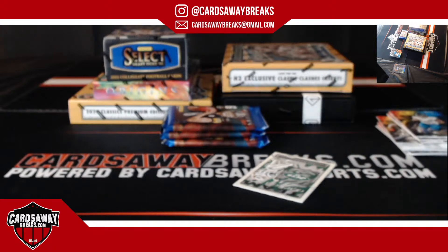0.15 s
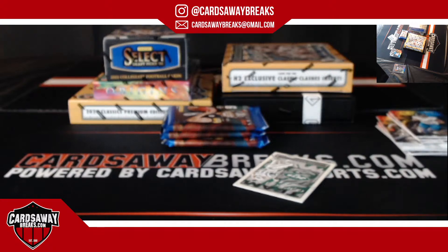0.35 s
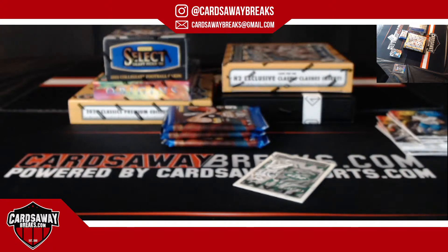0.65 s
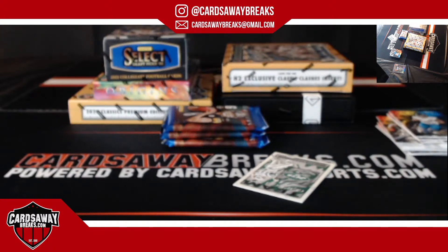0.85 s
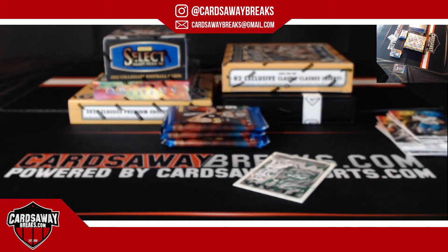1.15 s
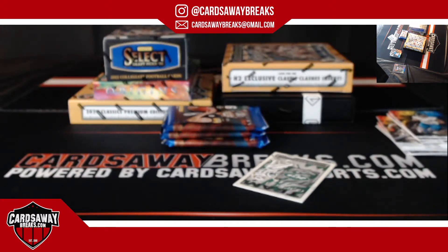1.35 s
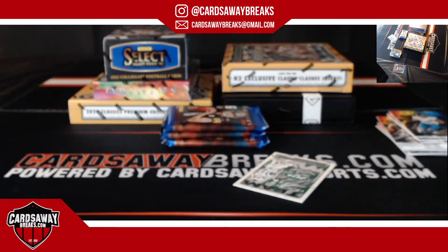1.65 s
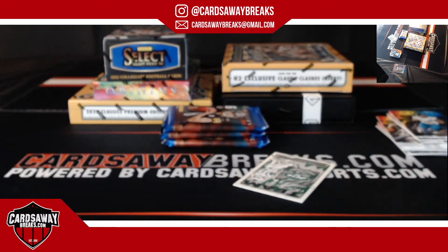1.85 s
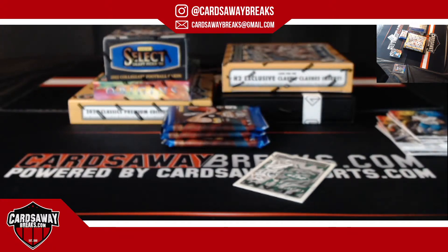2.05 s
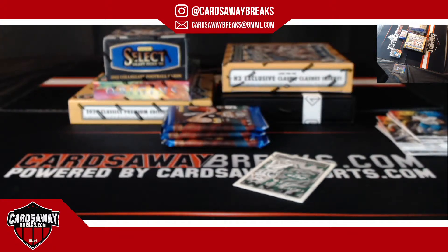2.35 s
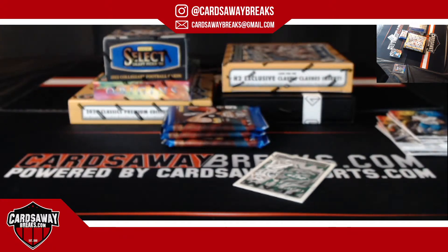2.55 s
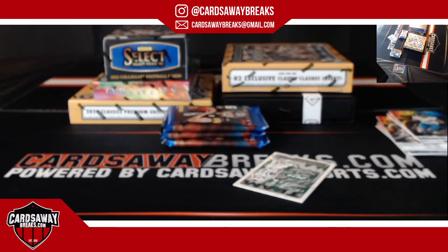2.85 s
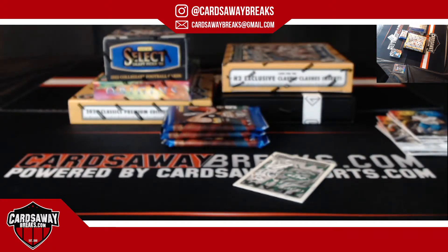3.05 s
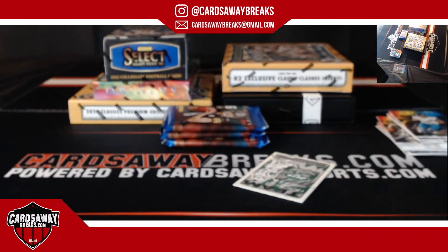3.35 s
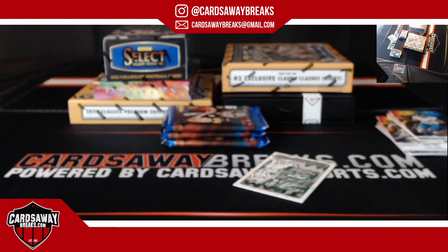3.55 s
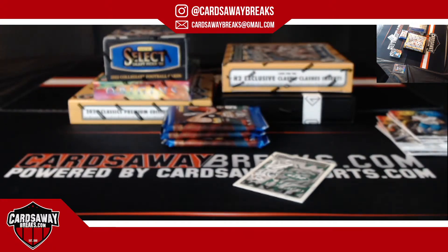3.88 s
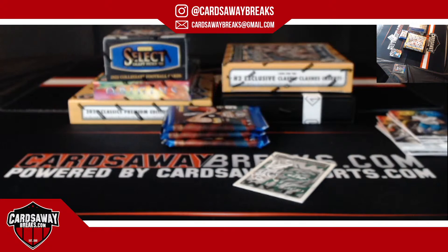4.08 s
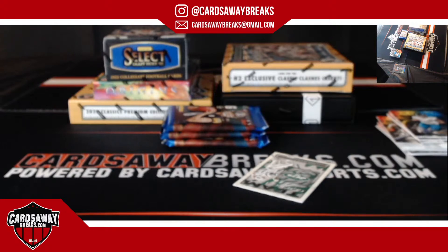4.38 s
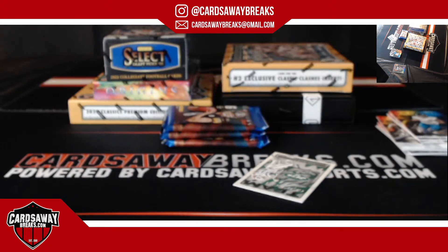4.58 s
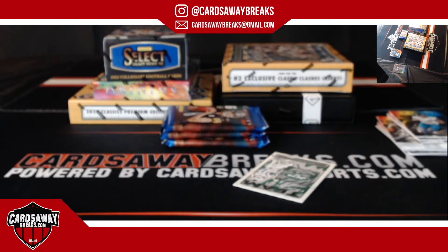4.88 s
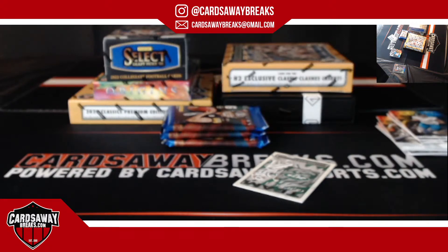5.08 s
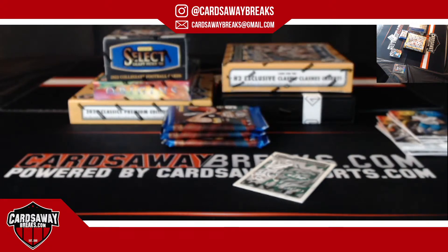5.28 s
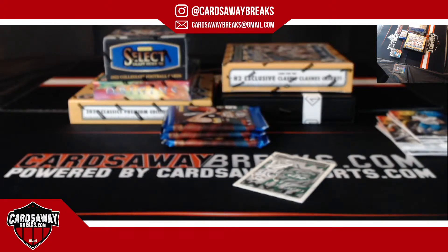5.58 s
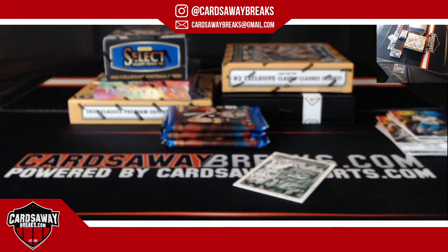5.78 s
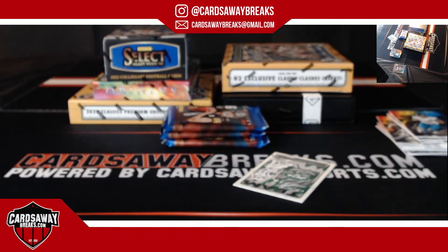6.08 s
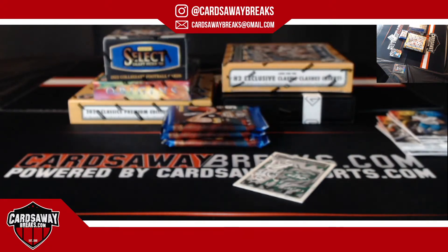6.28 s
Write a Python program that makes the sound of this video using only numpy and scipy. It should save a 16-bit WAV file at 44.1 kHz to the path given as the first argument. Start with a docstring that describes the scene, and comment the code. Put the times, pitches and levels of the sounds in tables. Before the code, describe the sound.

At a table in a small room, a trading card and a thin plastic sleeve are handled close to the microphone. After a few faint ticks and a soft bump, the card slides in with a short, falling swish. The plastic snaps crisply several times and rustles lightly under the fingers. Near the end a hard plastic case is set down with one ringing clack, followed by a soft bump. Low ventilation rumbles faintly throughout.

```python
"""A table in a small room: trading cards are worked into thin plastic sleeves, heard from close by.
The film rubs and buckles in snaps; one card slides in, and the pocket's resonance falls as it deepens.
A hard plastic case is knocked down and rings with the table; hands bump the padded top softly.
A low ventilation rumble lies under it all."""
import sys
import numpy as np
from scipy import signal
from scipy.fft import rfft, irfft, next_fast_len
from scipy.io import wavfile

SR = 44100
rng = np.random.default_rng(int(sys.argv[2]) if len(sys.argv) > 2 else 0)


def wrap_up_sound(samples):
    """Save the sound to the file named by the first command line argument, as 16-bit audio."""
    columns = np.atleast_2d(samples).T
    # keep every value between -1 and 1, then stretch to whole-number steps
    tamed = np.clip(columns, -1, 1)
    steps = np.round(tamed * 32767).astype(np.int16)
    wavfile.write(sys.argv[1], SR, steps)


N = 283547


def amp(db):
    """Decibels to gain."""
    return 10 ** (np.asarray(db) / 20)


def unit(x):
    """x at rms 1."""
    return x / np.sqrt(np.mean(x ** 2) + 1e-20)


def along(points, hz):
    """(f/Hz, value) points read on a log frequency axis."""
    f, values = np.transpose(points)
    return np.interp(np.log(hz + 1), np.log(f + 1), values)


def curve(spectrum):
    """Gain function of a (f/Hz, level/dB) spectrum."""
    return lambda hz: amp(along(spectrum, hz))


def spread(knots, t, span):
    """Evenly spaced knots over 0..span, read at t."""
    return np.interp(t, np.linspace(0, span, len(knots)), knots)


def add(track, start_s, x):
    """Mix x into the track from start_s."""
    part = track[round(start_s * SR):][:len(x)]
    part += x[:len(part)]


def filtered(x, gain):
    """x through the minimum-phase filter gain(hz)."""
    m = 2 * next_fast_len(len(x) // 2 + 2048)
    magnitude = np.maximum(gain(np.fft.rfftfreq(m, 1 / SR)), 1e-6)
    cepstrum = irfft(np.log(magnitude), m)
    cepstrum[1:m // 2] *= 2
    cepstrum[m // 2 + 1:] = 0
    return irfft(rfft(x, m) * np.exp(rfft(cepstrum)), m)[:len(x)]


def swept(x, gain):
    """x through the time-varying filter gain(hz, t)."""
    hz, t, frames = signal.stft(x, SR, nperseg=256)
    return signal.istft(frames * gain(hz[:, None], t), SR, nperseg=256)[1][:len(x)]


def coloured(x, spectrum):
    """x filtered by a (f/Hz, level/dB) spectrum, at rms 1."""
    return unit(filtered(x, curve(spectrum)))


def resonance(hz, centre_hz, q):
    """Gain of one resonance, 1 at its centre."""
    return 1 / np.sqrt(1 + (q * (hz / centre_hz - centre_hz / (hz + 1))) ** 2)


def burst(gain, t60_s):
    """Decaying cluster of micro-contacts, with the energy of 2 ms at rms 1."""
    t = np.arange(SR // 12) / SR
    contacts = rng.choice([-1, 1], len(t)) * rng.uniform(0.9, 1, len(t))
    x = filtered(contacts * amp(-60 * t / t60_s), gain)
    return x * np.sqrt(.002 * SR / np.sum(x ** 2))


def friction(count, grain_db, rate_hz):
    """Noise whose strength jumps as surfaces catch and let go."""
    position = np.arange(count) * rate_hz / SR
    knots = rng.standard_normal(int(position[-1]) + 2)
    grip = np.interp(position, np.arange(len(knots)), knots)
    return rng.standard_normal(count) * amp(grain_db * grip)


# Ventilation spectrum: f/Hz, level/dB
VENT_SPECTRUM = [(12, -31.5), (20, 3), (96, -7.5), (146, -13), (168, -16.5), (204, -10), (319, -18),
                 (527, -23), (607, -26), (660, -26), (949, -31), (1030, -29.5), (1220, -36), (1960, -37.5),
                 (16000, -51)]


def ventilation():
    """Steady rumble with a faint hiss."""
    return amp(-63.5) * coloured(rng.standard_normal(N), VENT_SPECTRUM)


# Room decay: f/Hz, t60/s
ROOM_DECAY = [(100, 0.48), (400, 0.2), (1500, .22), (3000, 0.21), (6000, .22), (14000, 0.18)]


def room_tail(build_s):
    """Diffuse reflections build up, then die at each frequency's own rate; energy 1."""
    tail = swept(rng.standard_normal(SR // 2), lambda hz, t: amp(-60 * t / along(ROOM_DECAY, hz)))
    tail *= 1 - np.exp(-np.arange(len(tail)) / SR / build_s)
    return tail / np.linalg.norm(tail)


# Dull contact spectrum, also for card flicks: f/Hz, level/dB
DULL_SPECTRUM = [(60, -18), (200, -14), (430, 2.5), (700, -4), (1400, -5.5), (4000, -34)]
# Soft bumps: t/s, level/dB, f/Hz, t60/s
SOFT_BUMPS = [(.478, -38.5, 114, 0.034), (0.5421, -46.5, 216, 0.014), (2.325, -44.5, 56.3, 0.075),
              (3.2595, -43, 515, 0.021), (6.276, -52, 324, 0.067), (6.2798, -37, 144, 0.026),
              (6.304, -49, 225, 0.092)]


def bumps():
    """A hand or card edge on the padded table gives a damped swing and a dull puff."""
    out, t = np.zeros(N), np.arange(SR // 4) / SR
    for start_s, db, hz, t60_s in SOFT_BUMPS:
        swing = np.sin(2 * np.pi * hz * t) * amp(-60 * t / t60_s)
        puff = burst(curve(DULL_SPECTRUM), t60_s=.054)
        add(out, start_s, amp(db) * swing)
        add(out, start_s, amp(db - 18.5) * puff)
    return out


# Case landing, on edge then flat: t/s, relative level/dB
CASE_CONTACTS = [(5.337, -21.5), (5.3407, -22.5)]
# Contact spectrum: f/Hz, level/dB
CLACK_SPECTRUM = [(60, -34.5), (150, -16), (400, -4), (800, -2), (1350, 1), (2100, -6), (3000, -1.5),
                  (3900, -12.5), (5200, -8), (8000, -22.5), (12000, -28.5), (16000, -32.5)]
# Modes of case and table: f/Hz, relative level/dB, t60/s
CASE_TABLE_MODES = [(62, -20.5, 0.55), (132.8, -4.5, .27), (166.7, -5.5, 0.25), (198, -10.5, .25),
                    (260, -8.5, 0.23), (301, -8, 0.27), (333, -3.5, 0.2), (408.3, -3, 0.15),
                    (442, -10.5, 0.28), (572, -3, .23), (687, -9.5, 0.24), (856, -6, 0.14),
                    (888, -11.5, .2), (989, -4.5, 0.12), (1153, -8.5, 0.1), (1238, -5.5, 0.075),
                    (1357, -2.5, .14), (1494, -10.5, .22), (1700, -11, .15), (1910, -6, .1),
                    (2140, -11.5, 0.061), (2436, -4.5, .09), (2870, -3, .11), (3040, -2.5, .09),
                    (3187, -10, .11), (3674, -10, 0.082), (4670, -8, .08)]
# Knock reverberation spectrum: f/Hz, level/dB
REVERB_SPECTRUM = [(50, -26), (110, -12), (200, 1.5), (400, 2), (900, 1), (1600, -2), (2200, -10.5),
                   (3000, -4.5), (4000, -12.5), (5600, -17.5), (8000, -23), (12000, -34), (16000, -40.5)]


def case_knock():
    """Two hard contacts clack, set case and table ringing, and fill the room."""
    out, t = np.zeros(N), np.arange(SR // 2) / SR
    for start_s, db in CASE_CONTACTS:
        add(out, start_s, amp(db + 3.5) * burst(curve(CLACK_SPECTRUM), t60_s=.054))
    edge_s, flat_s = CASE_CONTACTS[0][0], CASE_CONTACTS[-1][0]
    crack = burst(curve(TICK_SPECTRUM), t60_s=.003)
    add(out, flat_s, amp(-31.5) * crack)
    ring = np.zeros(len(t))
    for hz, db, t60_s in CASE_TABLE_MODES:
        swell = 1 - np.exp(-t / (.0017 + 1 / hz))  # heavy low modes start slower
        ring += swell * amp(db - 60 * t / t60_s) * np.sin(2 * np.pi * (hz * t + rng.random()))
    add(out, edge_s, amp(-25) * ring)
    add(out, edge_s, amp(-41.5) * coloured(room_tail(build_s=.0053), REVERB_SPECTRUM))
    far_room = amp(-46 - 60 * t / .6) * coloured(rng.standard_normal(len(t)), REVERB_SPECTRUM)
    add(out, edge_s, far_room)
    return out


# Spells of finger movement: start/s, end/s, scrape/dB, hiss/dB
FIDGET_SPELLS = [(.09, .24, -89, -82), (1.4, 1.53, -97, -89), (2.26, 2.42, -81, -91),
                 (3.758, 3.88, -86, -83.5), (4.421, 5.14, -83, -90.5)]


def fidgets(every_s=.07, length_s=.07, scatter_db=1.5, sleeve_hz=3487):
    """Stroke rows for fingers shifting grip: faint, of random length, strength and pitch."""
    rows = []
    for first_s, last_s, scrape_db, hiss_db in FIDGET_SPELLS:
        grid_s = np.arange(first_s, last_s - length_s / 2, every_s)
        for due_s, (late, longer, louder, higher) in zip(grid_s, rng.standard_normal((40, 4))):
            start_s = due_s + .18 * late * every_s
            end_s = start_s + length_s * np.exp(.25 * longer)
            db = scatter_db * louder
            rows.append((start_s, end_s, scrape_db + db, hiss_db + db, sleeve_hz * np.exp(.2 * higher)))
    return rows


def pushes(lead_s=.006, trail_s=.0054, scrape_db=-74.5, hiss_db=-85):
    """Stroke rows for the brief rub that drives each snap."""
    return [(s - lead_s, s + trail_s, scrape_db, hiss_db, ring_hz) for s, _, ring_hz, *_ in FILM_SNAPS]


def crinkles(count, rate_hz=63, db=15.5):
    """Sparse tiny buckles of uneven size in rubbed film."""
    return amp(db) * (rng.random(count) < rate_hz / SR) * rng.laplace(size=count)


# Card scrape spectrum: f/Hz, level/dB
SCRAPE_SPECTRUM = [(150, -26), (500, 2.5), (1200, -2), (3300, -3.5), (6000, -4), (8500, -11.5),
                   (16000, -34.5)]
# Film hiss spectrum: f/Hz, level/dB
HISS_SPECTRUM = [(1000, -36.5), (5500, -10.5), (8000, -4.5), (10000, -0.5), (12000, -1.5), (14000, -7),
                 (16000, -5.5)]
# Strokes: start/s, end/s, scrape/dB, hiss/dB, sleeve resonance/Hz
RUB_STROKES = [(.166, .183, -83, -73.5, 14000), (0.437, 0.537, -75.5, -86, 4080),
               (0.765, .912, -86, -84, 3700), (1.51, 1.73, -91, -76.5, 3700),
               (2.124, 2.274, -73, -71.5, 9000), (2.496, 2.532, -66.5, -69.5, 3270),
               (3.075, 3.133, -74.5, -91.5, 3060), (3.165, 3.19, -79, -89, 5640),
               (3.264, 3.344, -68, -73, 6200), (3.35, 3.439, -72, -71.5, 6350),
               (3.539, 3.571, -76, -84, 4500), (3.623, 3.666, -68.5, -65.5, 6700),
               (3.738, 3.77, -76, -74, 10400), (3.909, 3.978, -77, -80, 4650),
               (4.023, 4.058, -70, -66.5, 3420), (4.249, 4.317, -72, -73, 2000),
               (4.355, 4.426, -72, -70, 3160), (4.549, 4.568, -74, -75.5, 3740),
               (4.867, 4.946, -82.5, -77.5, 5500), (5.143, 5.164, -74, -80.5, 3400),
               (5.55, 5.568, -69, -77, 1100), (5.582, 5.641, -69, -73, 6040), (6.27, 6.364, -77, -91, 896)]


def rubbing(overhang_s=.008, uneven_db=2.5):
    """Card and fingers rub the film at uneven speed; its bending modes drift as the grip moves."""
    out = np.zeros(N)
    for start_s, end_s, scrape_db, hiss_db, sleeve_hz in RUB_STROKES + pushes() + fidgets():
        count = int((end_s - start_s + 2 * overhang_s) * SR)
        hurry = spread(rng.standard_normal(9), np.arange(count), count - 1)
        speed = unit(np.hanning(count) ** .46 * amp(uneven_db * hurry))
        drift = rng.normal(0, .12, size=4)

        def bending(hz, t):
            mode_hz = sleeve_hz * np.exp(spread(drift, t, count / SR))
            return .34 + resonance(hz, mode_hz, q=9.8) + .32 * resonance(hz, 3.4 * mode_hz, q=7.9)

        card_rub = friction(count, grain_db=4.5, rate_hz=480)
        film_rub = friction(count, grain_db=3.5, rate_hz=1100) + crinkles(count)
        scrape = amp(scrape_db) * coloured(swept(card_rub, bending), SCRAPE_SPECTRUM)
        hiss = amp(hiss_db) * coloured(swept(film_rub, bending), HISS_SPECTRUM)
        add(out, start_s - overhang_s, speed * (scrape + hiss))
    return out


# Sliding friction spectrum: f/Hz, level/dB
SLIDE_SPECTRUM = [(300, -12), (900, -10), (1400, 0), (3500, -1), (5000, -1), (7000, 2), (9000, -2),
                  (13000, 0.5), (16000, -10)]
# Slide envelope: t/s, level/dB
SLIDE_ENVELOPE = [(1.7, -84), (1.724, -77.5), (1.774, -51), (1.79, -48.5), (1.808, -56), (1.85, -61.5),
                  (1.89, -80), (1.9, -98)]
POCKET_START_M, POCKET_END_M, SOUND_M_PER_S = .021, .074, 343
FASTEST_S, EASE_S = 1.823, .015
LIP_HZ, LIP_JUMP_HZ, LIP_OPENS_S, LIP_RELAX_S = 4760, 1000, 1.831, .028


def card_slide():
    """The pocket, a quarter-wave pipe, falls in pitch as the card enters; the lip's pitch jumps once."""
    times_s, levels_db = np.transpose(SLIDE_ENVELOPE)
    start_s, length_s = times_s[0], times_s[-1] - times_s[0]
    count = int(length_s * SR)
    flex = .06 * rng.standard_normal(24)  # flexing film detunes the pipe

    def sleeve(hz, t):
        now_s = start_s + t
        inserted = 1 / (1 + np.exp((FASTEST_S - now_s) / EASE_S))
        depth_m = POCKET_START_M + (POCKET_END_M - POCKET_START_M) * inserted
        pocket_hz = SOUND_M_PER_S / (4 * depth_m) * np.exp(spread(flex, t, length_s))
        opening = (now_s > LIP_OPENS_S) * np.exp(-abs(now_s - LIP_OPENS_S) / LIP_RELAX_S)
        pocket = resonance(hz, pocket_hz, q=5.5) ** 2
        overtone = resonance(hz / 3, pocket_hz, q=5.5) ** 2
        lip = resonance(hz, LIP_HZ + LIP_JUMP_HZ * opening, q=17) ** 2
        return .14 + pocket + .15 * overtone + .84 * lip

    rub = coloured(friction(count, grain_db=2.5, rate_hz=400), SLIDE_SPECTRUM)
    envelope = amp(np.interp(start_s + np.arange(count) / SR, times_s, levels_db))
    out = np.zeros(N)
    add(out, start_s, envelope * unit(swept(rub, sleeve)))
    return out


# Lone creases: t/s, level/dB, ring/Hz
FILM_CREASES = [(2.038, -66, 1700), (2.087, -67, 5700), (2.093, -56.5, 2480), (2.557, -69, 9460),
                (3.2437, -58, 4000), (3.2483, -54, 5300), (3.558, -61, 5070), (4.634, -69, 3800),
                (4.854, -70, 5600), (5.782, -70, 4500), (6.339, -63, 5000)]
# Snaps: t/s, level/dB, ring/Hz, treble edge/Hz, card flick/dB, loss per side tick/dB
FILM_SNAPS = [(.479, -57.5, 4000, 7000, -66, 15), (.5142, -56, 3800, 8150, -62, 16),
              (0.5421, -59, 4570, 10200, -56.5, 18), (1.971, -58.5, 5250, 11500, -81, 2.5),
              (2.099, -48, 6200, 7740, -56, 16), (2.1607, -38, 8800, 13600, -62, 7),
              (2.2, -49.5, 3900, 12020, -59, 26), (2.26, -53.5, 4930, 9910, -75, 13),
              (2.3267, -30, 6500, 14000, -60, 3.5), (2.5229, -47, 3350, 9400, -57, 11),
              (3.2576, -36.5, 6500, 8800, -50, 10.5), (3.309, -44, 4400, 10500, -54, 11),
              (4.156, -61, 3460, 10000, -60, 9), (4.177, -66, 3800, 9900, -70, 11),
              (5.039, -60, 3300, 5000, -73, 12)]


def ticks(gap_s=.0022, lead_loss_ratio=1.25, crease_edge_hz=9500, crease_flick_db=-8.5):
    """Tick rows: one per crease, a run of five per snap, strongest in the middle."""
    rows = [(s, db, ring_hz, crease_edge_hz, db + crease_flick_db) for s, db, ring_hz in FILM_CREASES]
    for middle_s, db, ring_hz, edge_hz, flick_db, side_db in FILM_SNAPS:
        for k in range(-2, 3):
            loss_db = side_db * abs(k) * (lead_loss_ratio if k < 0 else 1)
            late, detune = abs(k) * rng.normal(0, .1, size=2)
            start_s = middle_s + (k + late) * gap_s
            rows.append((start_s, db - loss_db, ring_hz * np.exp(detune), edge_hz, flick_db - loss_db))
    return rows


# Plastic tick spectrum, also for the case's crack: f/Hz, level/dB
TICK_SPECTRUM = [(200, -27.5), (700, -14), (1500, 3), (4000, 1.5), (7000, -0.5), (11000, 1), (16000, -3.5)]


def snaps(flick_lag_s=.0008):
    """The film buckles: a bright tick at the free flap's pitch, then a duller flick of the card."""
    out = np.zeros(N)
    for start_s, db, ring_hz, edge_hz, flick_db in ticks():
        def flap(hz):
            ringing = .21 + resonance(hz, ring_hz, q=6.2) + .31 * resonance(hz, 2.5 * ring_hz, q=2.2)
            rolloff = 1 / np.sqrt(1 + (hz / edge_hz) ** 10)
            return amp(along(TICK_SPECTRUM, hz)) * ringing * rolloff

        add(out, start_s, amp(db) * burst(flap, t60_s=.0065))
        add(out, start_s + flick_lag_s, amp(flick_db) * burst(curve(DULL_SPECTRUM), t60_s=.0033))
    return out


def scene(table_echo_s=.0013, table_echo_db=-13, room_db=-22):
    """Mono mix: close handling with one table reflection and a little room, plus knock and rumble."""
    film = snaps() + rubbing() + card_slide()
    close = film + bumps()
    add(close, table_echo_s, amp(table_echo_db) * film)
    reflections = signal.fftconvolve(close, room_tail(build_s=.0017))[:N]
    return (close + amp(room_db) * reflections + case_knock() + ventilation())[None]


TOP_HZ = 15800


def record(dry):
    """Steep low-pass at the band limit."""
    m = next_fast_len(N + SR // 2)
    low_pass = 1 / (1 + (np.fft.rfftfreq(m, 1 / SR) / TOP_HZ) ** 110)
    return irfft(rfft(dry, m) * low_pass, m)[:, :N]


dry = scene()
out = record(dry)
wrap_up_sound(out)
```